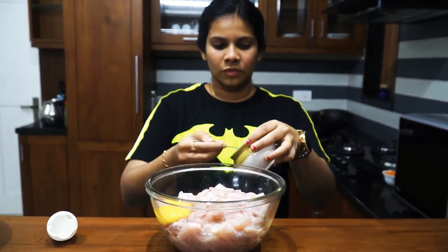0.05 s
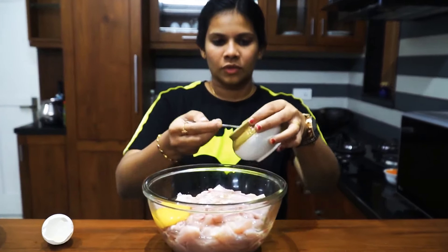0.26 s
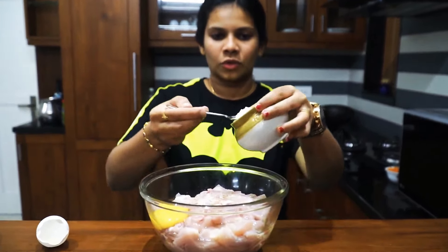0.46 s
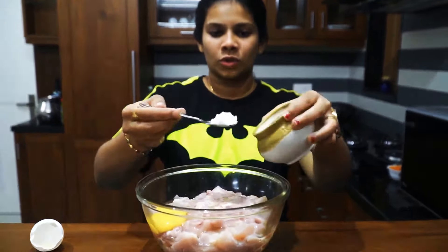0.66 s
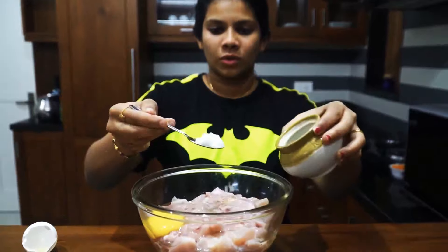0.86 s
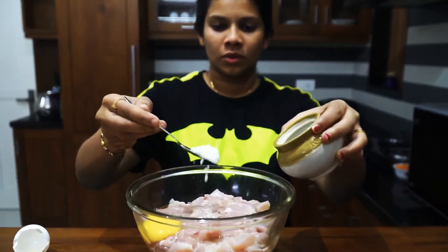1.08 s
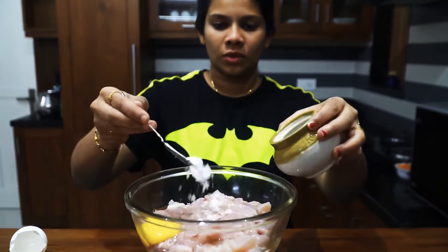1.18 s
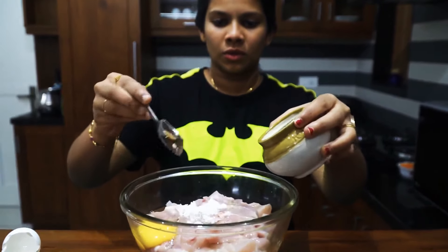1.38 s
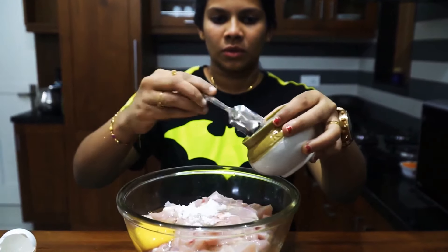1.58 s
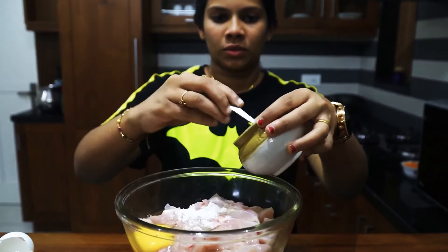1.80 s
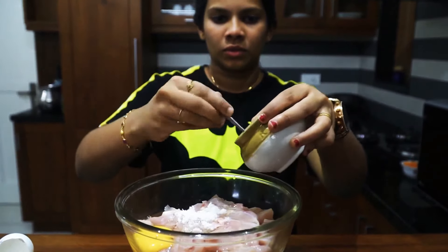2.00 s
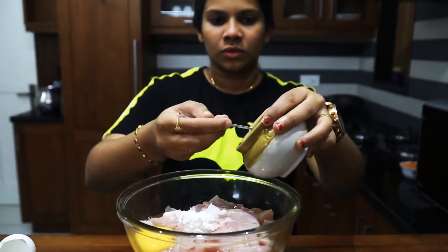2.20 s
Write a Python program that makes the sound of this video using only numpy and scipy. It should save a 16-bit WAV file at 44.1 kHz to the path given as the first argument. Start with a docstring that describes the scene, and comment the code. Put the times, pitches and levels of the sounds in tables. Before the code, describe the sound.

One ringing knock of jar on glass bowl, followed by a metal spoon clinking inside.

```python
"""A spoon stirs faintly in salt, then the small ceramic jar, as it is lifted, knocks the rim of a glass
mixing bowl; glass, jar and room ring. Faint ticks and a trickle of salt into the bowl follow.
The metal spoon goes back in, clinks on the jar wall and scrapes through the salt.
A hard-walled kitchen in stereo, at a distance where the room is nearly as loud as the direct sound."""
import sys
import numpy as np
from scipy import signal
from scipy.fft import rfft, irfft, next_fast_len
from scipy.io import wavfile

SR = 44100
rng = np.random.default_rng(int(sys.argv[2]) if len(sys.argv) > 2 else 0)


def store_pcm(level_fs):
    """Save levels as 16-bit WAV."""
    pcm = np.round(np.clip(level_fs, -1, 1) * 32767).astype(np.int16)
    wavfile.write(sys.argv[1], SR, np.atleast_2d(pcm).T)


N = 99225
TIME = np.arange(N) / SR

# the jar meets the bowl, a touch and then the full blow: start_s, level_db
KNOCKS = [(0.2165, -20.5), (0.2173, -3)]


def knock_ringing(room):
    """The knock's ringing: glass tones, a high ping from the jar and a low lingering room tone."""
    # modes of glass, jar (near 5.3 kHz) and room (near 650 Hz), mostly close pairs that beat:
    # pitch_hz, level_db, t60_s, left_over_right_db
    modes = [(631, -46, 1, 1), (665, -46.5, 1, -6), (1671.3, -16, 0.13, 10), (1667, -21, 0.29, -10),
             (3016, -26.5, 0.51, 5), (3042, -26, 0.34, -6.5), (4700, -27.5, 0.14, 18),
             (4717, -24, 0.069, -9.5), (5330, -41, 0.14, -19), (5420, -40, 0.072, 20),
             (6684, -37, 0.037, 12), (6696, -33, 0.052, 13), (8977, -38, 0.093, -14),
             (9045, -37.5, 0.054, 8), (11560, -48, 0.2, 2), (14390, -60, 0.23, 15)]
    return sum(pan(side) * in_room(knocked_mode(hz, db, t60), room, wet_db=-1.5)
               for hz, db, t60, side in modes)


def bowl_clunk(room):
    """The knock makes the filled bowl clunk dully on the table."""
    # spectrum of the clunk: frequency_hz, relative_db
    spectrum = [(40, -64), (120, -30), (220, -13), (390, -14), (520, 5.5), (750, 9), (1100, -3),
                (1600, 4.5), (2100, 0), (2700, -5.5), (3700, -16.5), (4600, -12), (6000, -47),
                (10000, -35.5), (16000, -33)]
    impact = rattle(clicks(KNOCKS), t60=0.034, snap=0.62)
    return in_room(colour(impact, lambda hz: at_hz(spectrum, hz) + 18), room, wet_db=2.5)


def table_thud(room):
    """The knock stirs short, damped resonances in the wooden table and the held jar."""
    # modes of table and jar: pitch_hz, level_db, t60_s
    modes = [(113, -59, 0.25), (177, -58, 0.26), (224, -43, 0.33), (295, -39, 0.29), (485, -38.5, 0.08),
             (735, -27, 0.2), (843, -24.5, 0.14), (1050, -29, 0.11), (1270, -28.5, 0.12), (1362, -29, 0.16),
             (1589, -29, 0.14)]
    return in_room(sum(knocked_mode(*mode) for mode in modes), room, wet_db=-8)


def knocked_mode(hz, db, t60):
    """One mode rung by the full blow, band-passed to soften its onset."""
    tone = from_db(db) * ring(clicks(KNOCKS[-1:]), hz, t60)
    return passed(tone, [hz / 2, hz * np.sqrt(2)], "band")


def spoon_clinks(room):
    """Steel cracks on glaze and rings the jar, left of centre; grains in between soften a contact."""
    # blows of the spoon: start_s, level_db, lowpass_hz
    contacts = [(0.002, -26, 5800), (0.029, -24, 6480), (1.8194, -1, 10900), (1.8963, -9.5, 4870),
                (1.907, -4.5, 4700), (1.913, -2.5, 3630), (1.9188, -15, 1870), (1.9283, -4, 6450),
                (1.9395, -4, 3530), (1.9478, -3, 10200), (1.9547, -2.5, 2640), (1.977, -13, 2600),
                (2.0202, -36, 6000), (2.0832, -19, 6000), (2.233, -22, 5960), (2.2423, -24.5, 12000)]
    # spectrum of the crack: frequency_hz, relative_db
    spectrum = [(100, -35), (400, -24), (800, -4.5), (2300, 5.5), (3600, -4.5), (5200, 14), (6500, -22),
                (10000, -12), (13500, 1), (16000, -25)]
    force = sum(passed(clicks([(s, db)]), hz, "low") for s, db, hz in contacts)
    crack = colour(rattle(force, t60=0.028, snap=0.73), lambda hz: at_hz(spectrum, hz) - 3)
    ringing = pan(db=7.5) * in_room(jar_ring(force), room, wet_db=-2.5)
    return ringing + in_room(crack, room, wet_db=-2)


def jar_ring(force):
    """A force sets the jar's modes ringing; the small jar radiates no bass."""
    # modes of the jar, damped by the hand: pitch_hz, level_db, t60_s
    modes = [(862, -40.5, 0.044), (1049.3, -41, 0.097), (1728, -43, 0.068), (2230, -40, 0.02),
             (3125, -36, 0.023), (5150, -35, 0.077), (5212, -26.5, 0.051), (5244, -22.5, 0.056),
             (5297, -27.5, 0.075), (8300, -38, .015), (13420, -32, 0.07)]
    ringing = sum(from_db(db) * ring(force, hz, t60) for hz, db, t60 in modes)
    return passed(ringing, 666, "high")


def salt_scrape(room):
    """Grains crush and slip between spoon and jar, as loud as the spoon digs; the jar sounds hollow."""
    # how hard the spoon digs: time_s, relative_db
    dig = [(0, -19), (.03, -20.5), (.075, -26.5), (.12, -34.5), (.2, -42), (0.4, -75), (1.83, -70),
           (1.88, -19), (1.9, -15), (1.955, -10), (1.985, -16), (2.04, -31), (2.09, -31), (2.135, -18),
           (2.19, -30.5), (2.225, -24.5), (2.25, -18)]
    # salt grinding in the jar's hollow: frequency_hz, relative_db
    spectrum = [(100, -33), (300, -21), (600, 2.5), (850, 8), (1050, 17), (1300, 8.5), (2000, 3), (3500, 3),
                (4800, -10), (5290, -17), (5900, -5.5), (10000, -9), (13500, -6), (16000, -12)]
    grains_per_s, spread_db = 1600, 3.5
    sizes = from_db(spread_db * np.minimum(rng.exponential(1, N), 4))
    signs = rng.choice([-1, 1], N)
    slips = rng.random(N) < grains_per_s / SR
    force = unit(sizes * signs * slips) * np.sqrt(N) * envelope(dig)
    crunch = colour(force, lambda hz: at_hz(spectrum, hz) - 27)
    hollow = from_db(-18.5) * jar_ring(passed(force, 1520, "low"))
    return in_room(crunch + hollow, room, wet_db=-2)


def faint_ticks(room):
    """Small, short clicks, each in its own band."""
    # faint ticks: start_s, level_db, centre_hz, half_width_octaves, wet_db
    ticks = [(0.2497, -13, 9050, 0.23, -5), (0.379, -16.5, 6940, 0.6, -2), (0.7445, -13.5, 630, 0.42, -3),
             (0.863, -13, 1960, 0.33, -1), (1.066, -11.5, 4200, 0.2, -1), (1.069, -13, 6800, 0.6, 4),
             (1.0688, -11, 1480, 0.27, 7), (1.892, -6, 2200, 0.17, -2), (2.2432, -3, 2600, 0.2, -2)]
    out = 0
    for s, db, hz, octaves, wet_db in ticks:
        tick = rattle(clicks([(s, db)]), t60=0.012, snap=1)
        band_hz = [hz / 2 ** octaves, hz * 2 ** octaves]
        out = out + in_room(passed(tick, band_hz, "band"), room, wet_db)
    return out


def salt_pour():
    """Fine grains trickle off the spoon, land in the bowl and merge into a dying hiss."""
    # flow of salt: time_s, relative_db
    flow = [(1.05, -85), (1.09, -56), (1.2, -61), (1.33, -64), (1.39, -85)]
    return envelope(flow) * passed(diffuse(), (1173, 5140), "band")


def spoon_shimmer():
    """Salt sliding over the spoon keeps one high mode of the steel singing faintly."""
    # loudness of the singing steel: time_s, level_db
    slide = [(0, -67), (.19, -67), (.3, -76), (1.0, -79), (1.14, -69), (1.3, -67), (1.42, -75), (1.6, -90)]
    return envelope(slide) * np.sqrt(N) * unit(ring(diffuse(), hz=8260, t60=0.053))


def arm_rustle():
    """A soft, low brushing while the arms move."""
    # strength of the rustle: time_s, relative_db
    moves = [(0, -45), (.13, -43.5), (.3, -80), (1.2, -70), (1.45, -50), (1.75, -51), (1.9, -58)]
    return envelope(moves) * passed(diffuse(), (263, 378), "band")


def background_hiss():
    """A quiet, steady hiss lies under everything."""
    # spectrum of the hiss: frequency_hz, relative_db
    spectrum = [(30, -48), (100, -27), (260, -13), (500, -1), (720, 0), (1050, -2.8), (1700, -4),
                (3900, -2.5), (6200, -4), (8300, -4.5), (13400, -10), (16000, -12)]
    return colour(diffuse(), lambda hz: at_hz(spectrum, hz) - 53)


def kitchen():
    """Room response: a few distinct, dulled echoes over a dense tail that dies band by band."""
    # the kitchen's decay: frequency_hz, t60_s
    decay = [(150, 1), (600, 0.98), (1600, 0.63), (5000, 0.74), (14000, 0.47)]
    # first reflections off ceiling, cupboards and walls: delay_s, level_against_tail_db
    echoes = [(0.01196, -13), (0.01495, -14), (0.02273, -11.5), (0.03409, -15.5)]
    gap_s, early_lift, early_s = 0.0031, 0.13, 0.0017
    noise, hz = rfft(diffuse()), np.fft.rfftfreq(N, 1 / SR)
    centres = np.geomspace(125, 16000, 8)
    tail = 0
    for centre, share in zip(centres, np.eye(len(centres))):
        band = irfft(noise * at_hz(np.c_[centres, share], hz), N)
        tail = tail + band * from_db(-60 * TIME / at_hz(decay, centre))
    onset = (TIME > gap_s) * (1 + early_lift * np.exp(-TIME / early_s))
    return unit(tail * onset) + passed(clicks(echoes), 7500, "low")


def in_room(x, room, wet_db):
    """Share the sound's energy between the direct path and reverberation at wet_db relative to it."""
    x = np.atleast_2d(x)
    wet = signal.fftconvolve(x, room[:, :SR], axes=1)[:, :N]
    strength = np.linalg.norm(x) / np.sqrt(len(x))
    return strength * unit(unit(x) + from_db(wet_db) * unit(wet))


def diffuse():
    """White noise at two microphones, alike in the bass and looser in the treble."""
    # likeness of left and right: frequency_hz, correlation
    likeness = [(100, 1), (250, 0.87), (500, 0.73), (1000, 0.77), (2200, 0.74), (5500, 0.64), (12000, 0.31)]
    mid, side = rfft(rng.standard_normal((2, N)))
    alike = np.clip(at_hz(likeness, np.fft.rfftfreq(N, 1 / SR)), 0, 1)
    return irfft(np.sqrt(1 + alike) * mid + np.sqrt(1 - alike) * side * [[1], [-1]], N)


def rattle(x, t60, snap):
    """Each click becomes a sharp edge and a burst of dense, fast-dying modes, unequal left and right."""
    burst = unit(diffuse()[:, :SR // 4] * from_db(-60 * TIME[:SR // 4] / t60))
    return snap * x + signal.fftconvolve(x[None], burst, axes=1)[:, :N]


def ring(x, hz, t60):
    """A unit click sets a tone of height 1 ringing."""
    radius, angle = from_db(-60 / (t60 * SR)), 2 * np.pi * hz / SR
    return signal.lfilter([.5, 0, -.5], [1, -2 * radius * np.cos(angle), radius * radius], x + 1e-18)


def clicks(rows):
    """One impulse for each row of start_s, level_db."""
    s, db = np.transpose(rows)
    out = np.zeros(N)
    out[np.clip((s * SR).astype(int), 0, N - 1)] = from_db(db)
    return out


def colour(x, db_at):
    """Causal filter whose gain in dB is db_at(hz)."""
    size = next_fast_len(2 * N)
    gain = from_db(db_at(np.fft.rfftfreq(size, 1 / SR)))
    cepstrum = irfft(np.log(gain), size)
    cepstrum[1:size // 2] *= 2  # fold to minimum phase
    cepstrum[size // 2 + 1:] = 0
    return irfft(rfft(x, size) * np.exp(rfft(cepstrum)), size)[..., :N]


def passed(x, hz, kind):
    """A gentle low-, high- or band-pass."""
    return signal.sosfilt(signal.butter(2, np.minimum(hz, SR / 2 - 1), kind, fs=SR, output="sos"), x)


def envelope(points):
    """Gain gliding through rows of time_s, level_db."""
    return from_db(np.interp(TIME, *np.transpose(points)))


def at_hz(points, hz):
    """Read a table on a log-frequency axis."""
    frequencies, values = np.transpose(points)
    return np.interp(np.log(np.maximum(hz, 1)), np.log(frequencies), values)


def pan(db):
    """Stereo gains that put the left channel db above the right."""
    return from_db(np.array([[db], [-db]]) / 2)


def unit(x):
    """Scale to a mean energy of one per channel."""
    return x / np.sqrt(np.mean(np.sum(x ** 2, axis=-1)) + 1e-20)


def from_db(db):
    """Decibels to gain."""
    return 10 ** (np.asarray(db) / 20)


def scene():
    """Bowl, jar, spoon and salt in one kitchen, over a quiet hiss."""
    room = kitchen()
    hiss = background_hiss()
    knock = knock_ringing(room) + table_thud(room) + bowl_clunk(room)
    spooning = spoon_clinks(room) + salt_scrape(room)
    faint_sounds = faint_ticks(room) + spoon_shimmer() + arm_rustle() + salt_pour()
    return knock + spooning + faint_sounds + hiss


def record(dry):
    """The highest treble is cut steeply."""
    cutoff_hz = 15900
    return signal.sosfilt(signal.ellip(10, .1, 80, cutoff_hz, fs=SR, output="sos"), dry)


dry = scene()
out = record(dry)
store_pcm(out)
```